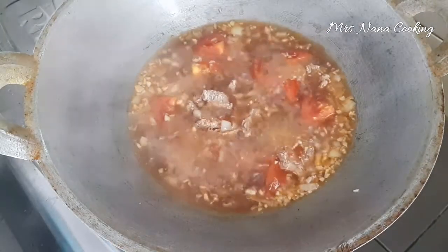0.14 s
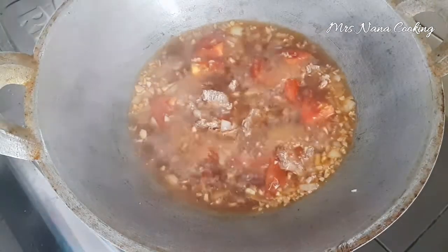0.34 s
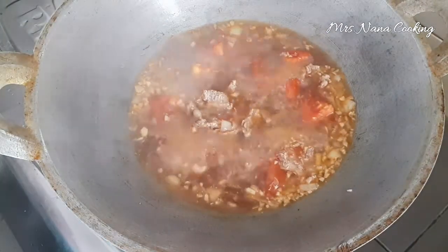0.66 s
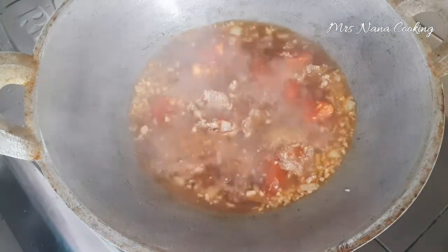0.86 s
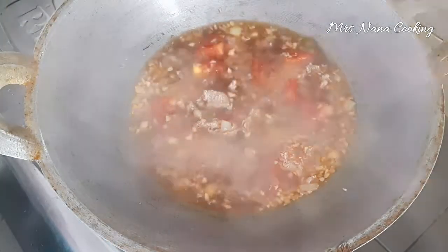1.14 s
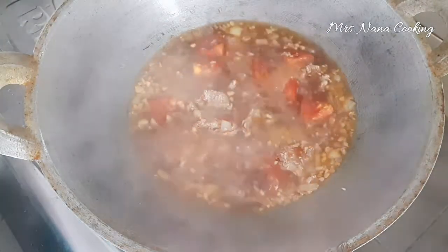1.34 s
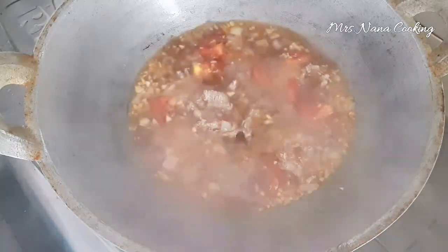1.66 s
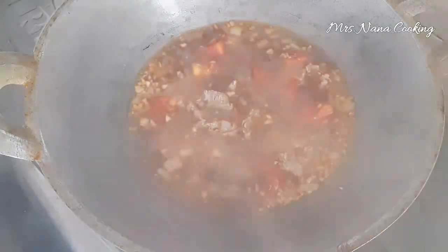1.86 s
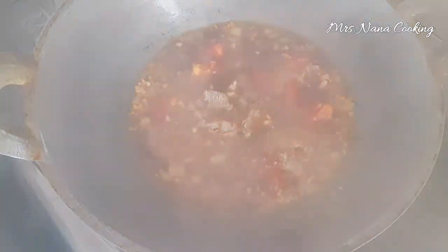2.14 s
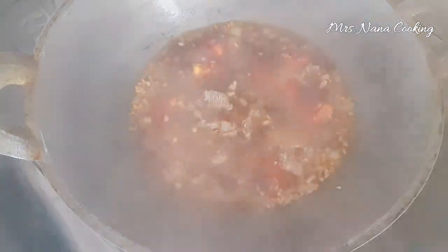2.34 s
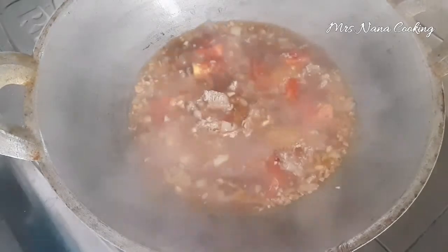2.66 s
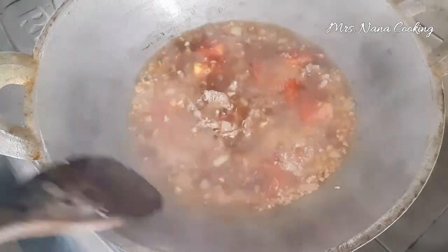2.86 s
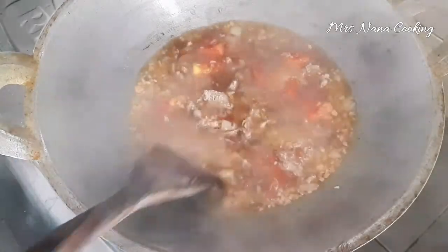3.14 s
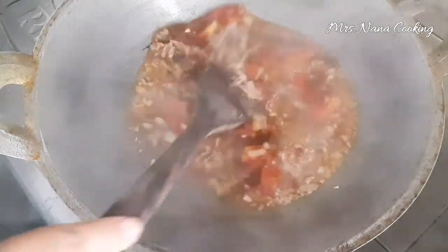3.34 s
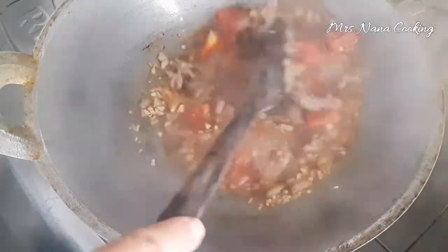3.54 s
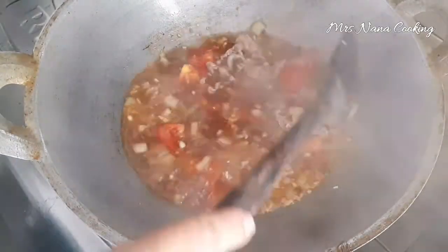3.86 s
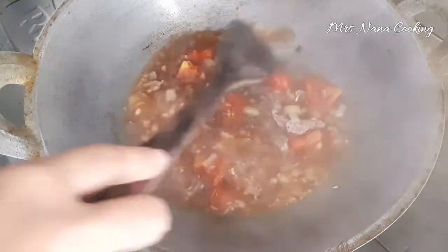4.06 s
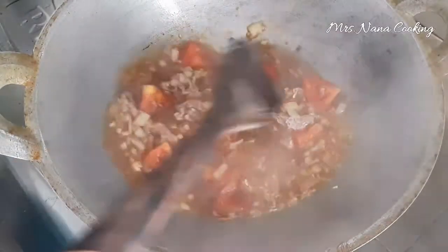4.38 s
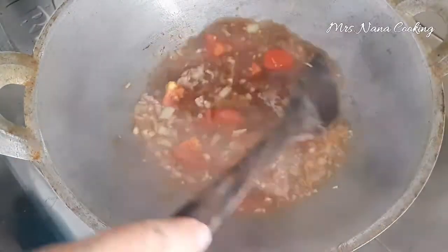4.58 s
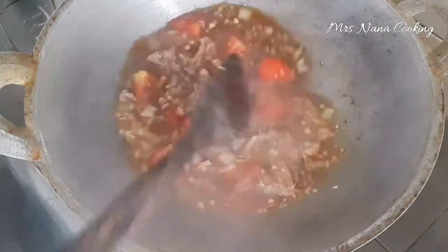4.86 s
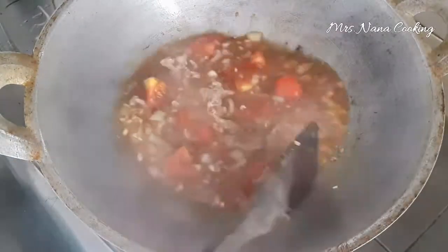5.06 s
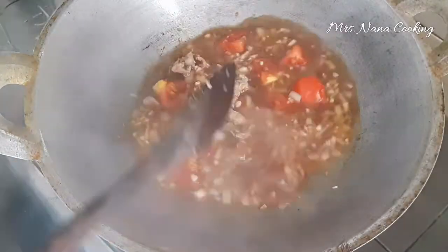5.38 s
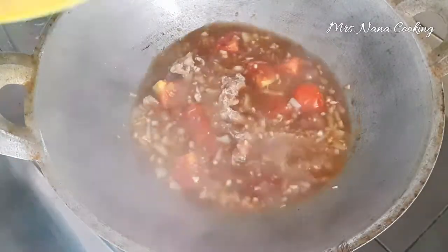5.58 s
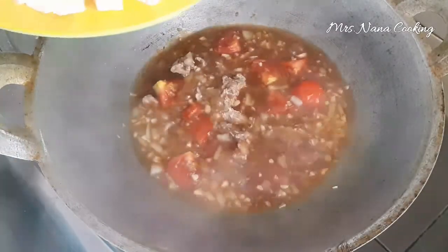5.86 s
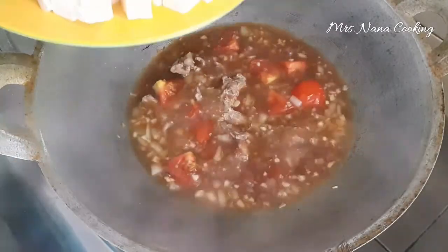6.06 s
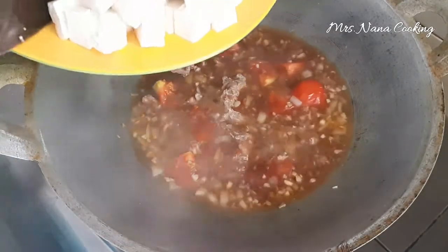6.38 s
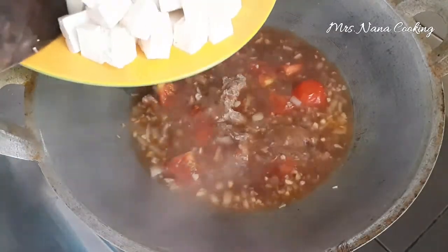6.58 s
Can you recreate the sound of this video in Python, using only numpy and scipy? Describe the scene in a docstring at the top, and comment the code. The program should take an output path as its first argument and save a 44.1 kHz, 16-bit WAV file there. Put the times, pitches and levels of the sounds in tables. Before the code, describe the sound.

Throughout, sauce boils in a wide metal wok: a dense fine fizz with tiny ticks and soft, round, slightly rising pops, over a low fluttering gas flame. A quick rattle of utensils opens the scene, lasting a tenth of a second; a sharper, lighter clatter comes at 1.1 and a faint brush at 1.4. Pops crowd from 1.6 to 2.5, with a dull counter thud at 2.2. At 3.3 a ladle clacks into the wok, slopping sauce and sizzling on hot metal, with steam hiss near 3.8. Pops cluster around 4.0 to 4.4, as heavy muffled knocks and scraping land at 4.1 to 4.3. The fizz drops, then slowly recovers; small high ticks near 4.8. A hard ringing ladle knock and short rattle follow at 5.3 to 5.5. From 5.6 a plate catches and slides, bumping at 6.15 and grinding around 6.3. Close phone pickup, lively hard-walled kitchen echo, highest treble missing.

```python
"""Sauce boils with a fine fizz and small popping bubbles over a rumbling gas flame in a small, hard-walled kitchen.
Utensils clatter beside the stove; a ladle stirs, knocks the wok and washes sauce onto hot metal; a plate is dragged.
Fizz is filtered random clicks, single pops are short rising tones, and the flame is filtered noise.
Rubbed and rattled things are clicks that ring an object; the ladle also adds decaying sines. Echo surrounds them.
A phone just above the wok hears it all and loses the highest treble."""
import sys
import numpy as np
from scipy import signal
from scipy.fft import rfft, irfft
from scipy.io import wavfile
from scipy.ndimage import uniform_filter1d

SR = 44100
rng = np.random.default_rng(int(sys.argv[2]) if len(sys.argv) > 2 else 0)


def store_pcm(level_fs):
    """Save levels as 16-bit WAV."""
    pcm = np.round(np.clip(level_fs, -1, 1) * 32767).astype(np.int16)
    wavfile.write(sys.argv[1], SR, np.atleast_2d(pcm).T)


N = 296219
T = np.arange(N) / SR  # time in seconds

# Broad colours of fizz, flame, sauce on hot metal and sauce flashing to steam.
# Each row: frequency in Hz, relative strength in dB per Hz.
FIZZ_COLOUR = [(240, -42), (400, -13), (498, -12.5), (610, -2), (686, -38), (716, -20), (1090, -6),
               (1510, -9), (2990, -8.5), (4490, -7.5), (13000, -15.5)]
FLAME_COLOUR = [(25, -24), (50, -20), (80, -15.5), (105, -2.5), (135, -7), (175, -7.5), (230, -10),
                (330, -5.5), (500, -16.5), (760, -10.5), (1200, -31), (3000, -57)]
SIZZLE_COLOUR = [(300, -38), (900, -4), (1450, 6.5), (2000, 6.5), (2600, 1), (4500, 6), (7000, -3.5),
                 (10500, -9), (13000, -17)]  # also the gritty scuffs of the plate
STEAM_COLOUR = [(500, -48), (1500, -0.5), (3000, 1.5), (5000, 0), (8000, -5.5), (11500, -5.5), (13000, -18)]
# Hollows under the wok that the flame excites. Each row: frequency in Hz, width in Hz, lift in dB.
FLAME_PEAKS = [(78, 3.4, 12.5), (139, 7.8, 5.5), (163.8, 12, 9), (745, 29, 2), (774, 16, 3.5),
               (848, 8.5, 7.5)]

# Single pops that stand out, with a few high ticks, perhaps drips or ladle taps, near 4.7 s.
# Each row: start in seconds, level before the room in dB, pitch in Hz.
SINGLE_POPS = [(0.676, -38, 1180), (0.781, -31.5, 2150), (0.885, -37, 1160), (1.563, -34.5, 940),
               (1.626, -36.5, 1060), (1.705, -35.5, 1090), (1.840, -28.5, 1040), (1.993, -36.5, 796),
               (2.058, -35, 1200), (2.080, -32.5, 1100), (2.086, -32, 1500), (2.198, -31.5, 930),
               (2.353, -30, 1150), (2.447, -36.5, 1330), (2.878, -33.5, 1100), (2.991, -36, 820),
               (3.854, -33, 1100), (3.936, -26.5, 1250), (3.951, -29.5, 1010), (3.989, -28.5, 1270),
               (4.007, -28.5, 1000), (4.053, -32, 1190), (4.092, -31, 1170), (4.109, -38, 960),
               (4.308, -29, 1400), (4.36, -31.5, 1290), (4.380, -31, 1160), (4.415, -33.5, 927),
               (4.623, -46, 1100), (4.657, -35.5, 2380), (4.755, -39, 990), (4.759, -33.5, 2550),
               (4.845, -31, 2780), (4.863, -38, 1200)]
# Spells when the sauce wells up and middling bubbles crowd.
# Each row: start in seconds, length in seconds, middle level before the room in dB.
WELLINGS = [(0.449, .5, -43), (1.582, 0.95, -42)]

# Ladle meets wok. Each row: start in seconds, push on the bowl in dB,
# ladle ring in dB (added to the level of each of its tones), contact cut-off in Hz.
KNOCKS = [(3.28, -13, -38.5, 700), (4.129, 2.5, -60, 600), (4.143, -2.5, -64, 550), (4.169, -3, -63, 260),
          (4.235, 4.5, -64, 200), (4.284, -6.5, -64, 260), (4.845, -23.5, -61, 1180), (4.95, -4, -66, 200),
          (5.309, 5.5, -37, 1720), (5.322, -12, -61, 700), (5.337, 2, -61, 400), (5.369, -11, -62, 980),
          (5.382, -6.5, -60, 800), (5.424, -10.5, -52.5, 1400), (5.487, -10.5, -54.5, 1480)]
# Tones of the struck ladle. Each row: pitch in Hz, relative level in dB, time to fade by 60 dB in seconds.
LADLE_TONES = [(1910, 7.5, 0.039), (2180, 4, 0.02), (2700, 5, 0.022), (3080, 7, 0.018), (3300, 5, 0.025),
               (3710, 8, 0.024), (4270, 8, 0.031), (4600, 9, 0.02), (5044, 6, 0.036), (5360, -6, 0.02),
               (6010, -1, 0.025), (6700, 6.5, 0.012), (9000, 9, 0.0018)]

# Strokes of rubbing, rattling or sliding.
# Each row: time of the peak in seconds, relative force in dB, rise time in seconds, fall time in seconds.
UTENSIL_RATTLE = [(0.008, -28, 0.0094, 0.0046), (0.021, -21, 0.0012, 0.0073), (0.032, -22, 0.007, 0.006),
                  (0.043, -15, 0.002, 0.0064), (0.054, -15, 0.0025, 0.008), (0.069, -17.5, 0.002, 0.007),
                  (0.085, -18.5, 0.002, 0.005), (0.099, -27, 0.0022, 0.0057)]
UTENSIL_LIFT = [(1.081, -20.5, 0.0039, 0.0046), (1.088, -23, 0.001, 0.0082), (1.097, -29, 0.0022, 0.014),
                (1.112, -30.5, 0.0025, 0.0097), (1.131, -32.5, 0.0035, 0.006)]
UTENSIL_BRUSH = [(1.415, -33.5, 0.012, 0.02), (1.483, -42, 0.0019, 0.0064), (2.69, -44, 0.013, 0.0041),
                 (3.066, -48, 0.0034, 0.0079)]
COUNTER_THUDS = [(2.215, -28.5, 0.0076, 0.0094), (2.241, -36.5, 0.0025, 0.044),
                 (5.519, -26.5, 0.0015, 0.007), (5.551, -39, 0.0033, 0.043), (5.612, -38.5, 0.012, 0.053),
                 (5.74, -36, 0.036, 0.024)]
LADLE_SCRAPES = [(3.31, -44.5, 0.023, 0.076), (3.43, -45, 0.037, 0.028), (3.55, -47, 0.052, 0.081),
                 (4.15, -29.5, 0.0072, 0.026), (4.21, -38, 0.11, 0.064), (5.322, -25.5, 0.0054, 0.015),
                 (5.37, -40, 0.015, 0.06)]
SLOPS = [(3.285, -38.5, 0.0038, 0.021), (3.355, -44.5, 0.01, 0.047), (3.53, -51, 0.043, 0.034),
         (3.6, -46.5, 0.024, 0.045), (4.3, -41, 0.022, 0.03), (4.937, -38.5, 0.018, 0.026),
         (4.995, -49, 0.015, 0.024)]  # the ladle shoves a wave of sauce, a hollow slop
WASHES = [(3.43, -37, 0.043, 0.045), (3.545, -38.5, 0.046, 0.021), (4.21, -42.5, 0.035, 0.12),
          (4.917, -49, 0.04, 0.057), (5.07, -54, 0.03, 0.037)]  # sauce is pushed up the hot wall
FLASH_BOILS = [(3.77, -48.5, 0.13, 0.066), (3.84, -42, 0.088, 0.012), (4.917, -48.5, 0.014, 0.044)]  # sauce flashes to steam
PLATE_SLIDES = [(5.683, -25, 0.00084, 0.021), (5.742, -25, 0.029, 0.059), (6.235, -33, 0.036, 0.052),
                (6.285, -20.5, 0.016, 0.035), (6.325, -18.5, 0.0033, 0.014), (6.35, -18.5, 0.0089, 0.03),
                (6.385, -24, 0.01, 0.038), (6.49, -36, 0.027, 0.058), (6.66, -56, 0.037, 0.0055)]
PLATE_CATCHES = [(5.600, -29.5, 0.0056, 0.012), (5.613, -33.5, 0.012, 0.088), (6.145, -27, 0.0013, 0.1),
                 (6.56, -34, 0.067, 0.12)]  # the rim drags with a low groan
PLATE_SCUFFS = [(5.683, -36.5, 0.0013, 0.042), (6.145, -31, 0.0014, 0.0039), (6.33, -35, 0.084, 0.14),
                (6.655, -38.5, 0.014, 0.0073)]  # the plate's foot grates
PLATE_BUMPS = [(6.146, -19, 0.0029, 0.013), (6.172, -17, 0.011, 0.042), (6.37, -24, 0.014, 0.043),
               (6.42, -25.5, 0.016, 0.033), (6.49, -27.5, 0.017, 0.038), (6.65, -36, 0.011, 0.037)]

# Broad colours of what is struck or rubbed. Each row: frequency in Hz, relative strength in dB per Hz.
RATTLE_COLOUR = [(47, -42), (80, -30), (162, -12), (330, -25), (510, -10), (780, -5.5), (1100, -8.5),
                 (1400, -14), (2000, -22), (3200, -23), (4800, -30.5), (7000, -26), (13000, -41.5)]
LIFT_COLOUR = [(47, -48), (80, -32), (140, -7), (200, -14), (440, -16.5), (520, -4.5), (650, -9),
               (800, 1.5), (1000, -4.5), (1400, -8), (2300, -9), (2900, -23.5), (3400, -22), (4600, -29.5),
               (6500, -24), (13000, -37)]
BRUSH_COLOUR = [(150, -5), (400, 0), (900, 9), (1600, 9.5), (2500, 10.5), (4000, 4), (7000, -7),
                (13000, -15)]
COUNTER_COLOUR = [(40, -38), (80, -5), (140, -7.5), (200, -3.5), (280, -6.5), (400, -13.5), (800, -18),
                  (3000, -36)]
BOWL_COLOUR = [(50, -23), (100, -16), (160, -11), (250, -7), (340, 0.5), (440, -5), (510, -7), (580, -1.5),
               (700, -6.5), (860, -4), (1120, -2), (1320, -2.5), (1550, -13), (2200, -14), (3000, -30),
               (4600, -20), (7000, -45), (13000, -43)]
SCRAPE_COLOUR = [(80, -21.5), (170, 0.5), (310, -5), (430, 0.5), (550, -1.5), (780, -6.5), (1100, -5),
                 (2000, -22), (4500, -15.5), (12000, -50)]
SLOP_COLOUR = [(100, -32.5), (220, -11.5), (340, -2), (450, -3.5), (520, -13), (850, -18.5), (1300, -22),
               (4000, -45)]
PLATE_COLOUR = [(59, -39), (100, -15), (277, -11.5), (410, -17.5), (530, -4.5), (766, -4.5), (1040, -4),
                (1150, -6.5), (1730, -7), (2940, -16), (3190, -19.5), (3990, -23), (4330, -25),
                (13000, -46.5)]
CATCH_COLOUR = [(60, -28), (110, -0.5), (260, -14), (360, -12.5), (490, -5), (640, -2), (860, -9),
                (1000, 0.5), (1150, -8.5), (1300, -5.5), (2000, -13), (4000, -22), (13000, -62)]
BUMP_COLOUR = [(40, -29), (90, -7.5), (140, -1.5), (210, -2), (270, 6), (360, -25), (550, -24), (900, -47),
               (3000, -61)]

# Resonances that stand out of those colours. Each row: frequency in Hz, width in Hz, lift in dB.
RATTLE_PEAKS = [(525, 60, 5.7), (588, 43, 5.9), (790, 110, 6.2), (805, 0.5, 12.6), (870, 72, 3.8),
                (1060, 29, 4.5), (1610, 81, 6), (1760, 160, 7.4), (2080, 32, 9), (2350, 84, 17.3),
                (2643, 92, 22.2), (2830, 41, 19.5), (2940, 110, 14), (3350, 87, 17), (3580, 100, 17.6),
                (3920, 73, 15), (4400, 88, 19), (4510, 60, 18), (5030, 40, 13), (5480, 180, 14),
                (6640, 140, 6.8), (7010, 60, 8)]
LIFT_PEAKS = [(752, 50, 9.4), (875, 76, 4.3), (1120, 89, 8.4), (1530, 33, 7.5), (2025, 38, 13.6),
              (2596, 24, 10), (2720, 34, 13), (3106, 46, 21.7), (3740, 45, 13), (4100, 85, 20),
              (4360, 55, 17), (4680, 55, 12), (5200, 37, 12), (5440, 47, 14), (5870, 40, 14),
              (6130, 61, 14)]
BRUSH_PEAKS = [(990, 52, 5), (1520, 35, 2.7), (2150, 44, 2.6), (2460, 130, 7.3), (3250, 46, 2.4),
               (4370, 120, 8.7)]
COUNTER_PEAKS = [(85.4, 2.1, 7), (151, 17, 15), (186, 3.3, 7.3), (240, 20, 13.4), (281, 31, 9.6)]
BOWL_PEAKS = [(199, 5.4, 7.5), (263, 6.3, 10), (322, 11.4, 13.4), (372, 15, 8.2), (404, 14, 7.8),
              (434, 12, 7), (464, 7.9, 5), (622, 11, 12.2), (749, 22, 15.6), (800, 13, 4.7), (841, 7.7, 14),
              (897, 17, 9.7), (1001, 5, 4.9), (1066, 8, 5), (1214, 9.7, 5.5), (1475, 8, 9.4)]
PLATE_PEAKS = [(533, 95, 3.3), (1028, 42, 11.6), (1230, 44, 9.9), (1420, 120, 5), (1700, 140, 4.1),
               (2040, 24, 3.3), (2400, 23, 5.1), (2550, 38, 5.3), (2970, 120, 3.8), (3580, 69, 8.1),
               (4050, 140, 3.4), (4700, 67, 5)]
CATCH_PEAKS = [(488, 34, 8.3), (680, 35, 4.4), (1017, 50, 8), (1300, 70, 4), (1430, 60, 8.1)]
BUMP_PEAKS = [(252, 22, 9.5), (293, 19, 8)]

# Echo of the kitchen. Each row: frequency in Hz, time to fade by 60 dB in seconds,
# likeness of left and right (correlation, no unit).
KITCHEN = [(108, 1, 0.94), (304, 0.68, 0.75), (580, 0.58, 0.81), (1100, 0.57, -0.065), (2290, 0.52, 0.09),
           (4500, 0.51, 0.17), (12000, 0.43, -0.16)]

# The boil is steady until stirring folds cooler sauce over the hot rim; then the flame slowly brings it back.
BOIL_DB, STIRRED_S, COOLING_S, COOLING_DB, REHEAT_DB_PER_S = -49.5, 4.39, 0.19, 5.5, 1
WELLING_POPS_PER_S, POP_PITCH_HZ, POP_OCTAVES = 18, 1100, 0.49  # octaves: full range of pitch in a spell
ABRUPT_S = 0.0037  # strokes that rise faster than this land with a blow
# Each blow lands elsewhere, under a different depth of sauce: spread of the tones' pitch (share) and level.
MODE_DETUNE, MODE_SCATTER_DB = 0.0061, 7.5
TOP_HZ = 13100  # the phone loses what lies above


def amp(db):
    """Turn decibels into a plain factor."""
    return 10 ** (np.asarray(db) / 20)


def unit(x):
    """Scale a sound to an average strength (rms) of 1."""
    return x / np.sqrt(np.mean(x ** 2))


def on_log_axis(hz, points, axis=1):
    """Read one column of a table along log frequency."""
    rows = np.array(points)
    return np.interp(np.log(hz + 1), np.log(rows[:, 0]), rows[:, axis])


def convolve(x, response):
    """Let each sample of a sound set off the response."""
    return signal.fftconvolve(np.atleast_2d(x), np.atleast_2d(response), axes=-1)[:, :N]


def causal(gain):
    """Build the promptest response with this gain over frequency (minimum phase)."""
    cepstrum = irfft(np.log(gain))
    half = len(cepstrum) // 2
    cepstrum[1:half] *= 2
    cepstrum[half + 1:] = 0
    return irfft(np.exp(rfft(cepstrum)))


def body(colour, peaks=(), size=32768):
    """Response of an object, with unit energy: a broad colour with resonances standing out of it."""
    hz = np.arange(size // 2 + 1) * SR / size
    lift = 1 + sum((amp(db) ** 2 - 1) / (1 + (2 * (hz - f) / width) ** 2) for f, width, db in peaks)
    response = causal(amp(on_log_axis(hz, colour)) * np.sqrt(np.maximum(lift, .5)))
    return response / np.linalg.norm(response)


def clicks(rate, spread_db):
    """Random tiny impacts, rate per second, with unequal sizes; rms 1."""
    size = amp(spread_db * np.minimum(rng.exponential(size=N), 5))
    happens = rng.random(N) < rate / SR
    return unit(happens * size * rng.choice([-1, 1], N))


def walk(rate):
    """Smooth random drift with a spread near 1, with rate turning points per second."""
    return np.interp(T * rate, np.arange(1000), rng.standard_normal(1000))


def add(track, s, sound):
    """Lay a short sound into a track at s seconds."""
    start = max(int(s * SR), 0)
    track[start:start + len(sound)] += sound[:max(N - start, 0)]


def evened(echo, hz, size=21):
    """Level the low room resonances so that none of them booms."""
    power = uniform_filter1d(np.mean(np.abs(rfft(echo)) ** 2, axis=0), size)
    return convolve(echo, causal(power ** (-.5 / (1 + (hz / 2000) ** 2))))


def kitchen(size=32768):
    """Stereo echo of tiled walls: fading noise whose lows stay longer and are more alike in both channels."""
    t, hz = T[:size], np.arange(size // 2 + 1) * SR / size
    alike = np.clip(on_log_axis(hz, KITCHEN, axis=2), -1, 1)
    mid, side = rfft(rng.standard_normal((2, size)))
    opposite = np.array([[1], [-1]])
    noise = mid * np.sqrt((1 + alike) / 2) + opposite * side * np.sqrt((1 - alike) / 2)
    echo = 0
    for k, (_, t60, _) in enumerate(KITCHEN):
        band = on_log_axis(hz, [(row[0], j == k) for j, row in enumerate(KITCHEN)])
        decay = np.exp(-np.log(1000) * t / t60)
        onset = np.clip(t / 0.0023, 0, 1)
        early_boost = 1 + 2.5 * np.exp(-t / 0.014)
        fade = decay * onset * early_boost
        echo = echo + irfft(noise * band) * fade / np.linalg.norm(fade)
    return evened(echo, hz)


def place(x, wet_db, count=0):
    """Direct sound, reaching the left port count samples late, plus room echo; power is roughly kept."""
    x = np.ravel(x)
    direct = np.array([np.pad(x, (count, 0))[:N], x])
    return (direct + amp(wet_db) * convolve(x, kitchen())) / np.hypot(1, amp(wet_db))


def bubble(hz, cycles, glide=0.01):
    """A bursting cap leaves a little cavity that rings briefly, rising in pitch as it opens."""
    turn = T[:SR // 60] * hz
    swell = turn / cycles * np.exp(.5 - .5 * (turn / cycles) ** 2)
    return swell * np.sin(2 * np.pi * turn * (1 + glide * turn))


def rub(strokes, colour, peaks, rate, spread_db, blow_db=-40):
    """Uneven stick-slip clicks follow each stroke and ring the object; an abrupt stroke lands with a blow."""
    force = sum(amp(db) * np.exp(-np.maximum((s - T) / rise, (T - s) / fall)) for s, db, rise, fall in strokes)
    grip = amp(3 * walk(140) - .7)
    drive = unit(force * grip * clicks(rate, spread_db)) * np.sqrt(np.mean(force ** 2))
    for s, db, rise, _ in strokes:
        blow = amp([db + blow_db]) * np.exp(-(rise / ABRUPT_S) ** 2)  # a single sample
        add(drive, s, blow)
    return convolve(drive, body(colour, peaks))


def heat_db():
    """Vigour of the boil, 0 dB when full: it sinks as the sauce is stirred and creeps back."""
    cooled = COOLING_DB * np.clip((T - STIRRED_S) / COOLING_S, 0, 1)
    reheated = REHEAT_DB_PER_S * np.maximum(T - STIRRED_S - COOLING_S, 0)
    return np.minimum(reheated - cooled, 0)


def fizz(crackle_db=-53, spread_db=3, pitch_hz=3400, surge_db=-0.5, flicker_db=2.0, count=900):
    """Countless tiny bubbles all round the rim hiss; single ones tick above them, each at its own pitch."""
    vigour = amp(heat_db() + surge_db * walk(34) + flicker_db * walk(45))
    hiss = np.array([clicks(14000, 1.0), clicks(14000, 3.9)]) * amp(BOIL_DB)  # left, right
    crackle = np.zeros(N)
    for when, size, pitch in rng.random((count, 3)):
        tick_db = crackle_db - spread_db * np.log(max(size, .02))
        hz = pitch_hz * 2 ** (2.6 * (pitch - .5))
        add(crackle, when * T[-1], amp(tick_db) * bubble(hz, cycles=4.7, glide=0.0036))
    return convolve(hiss * vigour, body(FIZZ_COLOUR)) + place(crackle * vigour, wet_db=8)


def burner(flame_db=-56):
    """The gas flame, noise coloured by hollows under the bowl, rumbles and flutters."""
    flutter = amp(1.5 * walk(9))
    roar = convolve(rng.standard_normal(N) * flutter, body(FLAME_COLOUR, FLAME_PEAKS))
    return amp(flame_db) * place(roar, wet_db=-3)


def popping(small_db=-51.5, spread_db=5.0, wet_db=-2, cycles=0.83, count=420):
    """Single pops stand out, middling bubbles come in spells, and many small ones weaken as the sauce cools."""
    out, heat = np.zeros(N), heat_db()
    for s, db, hz in SINGLE_POPS:
        add(out, s, amp(db) * bubble(hz, cycles))
    for (start, length, db), draws in zip(WELLINGS, rng.random((len(WELLINGS), 40, 3))):
        for k, (when, size, pitch) in enumerate(draws):
            delay = (k + when) / WELLING_POPS_PER_S
            if delay < length:
                hz = POP_PITCH_HZ * 2 ** (POP_OCTAVES * (pitch - .5))
                add(out, start + delay, amp(db) * (.5 + size) * bubble(hz, cycles))
    for when, size, pitch in rng.random((count, 3)):
        db = small_db - spread_db * np.log(max(size, .03)) + heat[int(when * N)]
        hz = POP_PITCH_HZ * 2 ** (1.4 * (pitch - .5))
        add(out, when * T[-1], amp(db) * bubble(hz, cycles=0.98))
    return place(out, wet_db)


def utensils():
    """Things handled beside the stove rattle, brush and thud, heard mostly by way of the walls."""
    rattle = rub(UTENSIL_RATTLE, RATTLE_COLOUR, RATTLE_PEAKS, rate=2200, spread_db=1.0, blow_db=17)
    lift = rub(UTENSIL_LIFT, LIFT_COLOUR, LIFT_PEAKS, rate=2400, spread_db=1.5, blow_db=24.0)
    brush = rub(UTENSIL_BRUSH, BRUSH_COLOUR, BRUSH_PEAKS, rate=2000, spread_db=2, blow_db=16)
    thuds = rub(COUNTER_THUDS, COUNTER_COLOUR, COUNTER_PEAKS, rate=3100, spread_db=2.5)
    handled = place(lift + brush, wet_db=5.5, count=17)[::-1]  # channels swapped: the right port hears it late
    return place(rattle, wet_db=2.0, count=4) + handled + place(thuds, wet_db=1.5)


def ring(modes):
    """Decaying sines of a struck object, a little different at each blow; neighbours start in opposite directions."""
    t = T[:SR // 2]
    chance = rng.standard_normal((len(modes), 2))
    total = np.zeros(len(t))
    for k, ((hz, db, t60), (louder, higher)) in enumerate(zip(modes, chance)):
        fade = amp(db + MODE_SCATTER_DB * louder - 60 * t / t60)
        tone = np.sin(2 * np.pi * hz * (1 + MODE_DETUNE * higher) * t)
        total += (-1) ** k * fade * tone
    return total / 2


def stirring():
    """The ladle knocks and scrapes the bowl and slops the sauce; sauce pushed up the hot wall sizzles."""
    bowl, ladle = np.zeros(N), np.zeros(N)
    t = T[:SR // 100]
    for s, bowl_db, ladle_db, contact_hz in KNOCKS:
        push = t * np.exp(-4 * np.pi * contact_hz * t)  # food in between makes a longer, softer push
        add(bowl, s, amp(bowl_db) * push / push.sum())
        add(ladle, s, amp(ladle_db) * ring(LADLE_TONES))
    bowl_knocks = place(convolve(bowl, body(BOWL_COLOUR, BOWL_PEAKS)), wet_db=1.5)
    knocks = bowl_knocks + place(ladle, wet_db=0)
    scrape = place(rub(LADLE_SCRAPES, SCRAPE_COLOUR, BOWL_PEAKS, rate=2500, spread_db=2.0), wet_db=2.5)
    slop = place(rub(SLOPS, SLOP_COLOUR, [], rate=1500, spread_db=1), wet_db=-3)
    sizzle = place(rub(WASHES, SIZZLE_COLOUR, [], rate=9000, spread_db=2), wet_db=2)
    steam = place(rub(FLASH_BOILS, STEAM_COLOUR, [], rate=8200, spread_db=3), wet_db=4)
    return knocks + scrape + slop + sizzle + steam


def plate(bump_db=-5.5):
    """A plate to the right catches, bumps and grinds across the counter by stick-slip rubbing."""
    slide = rub(PLATE_SLIDES, PLATE_COLOUR, PLATE_PEAKS, rate=550, spread_db=2.0, blow_db=21.0)
    bumps = rub(PLATE_BUMPS, BUMP_COLOUR, BUMP_PEAKS, rate=1700, spread_db=-0.5)
    scuffs = rub(PLATE_SCUFFS, SIZZLE_COLOUR, [], rate=3300, spread_db=0)
    catches = rub(PLATE_CATCHES, CATCH_COLOUR, CATCH_PEAKS, rate=1200, spread_db=2.0, blow_db=20)
    grinding = place(slide + catches + scuffs, wet_db=7.5, count=15)
    bumping = amp(bump_db) * place(bumps, wet_db=-6.5, count=15)
    return (grinding + bumping) * amp([[-.3], [.3]])  # dB left, right


def scene():
    """Mix the boil, flame, utensils, ladle and plate."""
    return fizz() + burner() + popping() + utensils() + stirring() + plate()


def record(dry):
    """The phone cuts the top with a steep low-pass filter."""
    low_pass = signal.ellip(10, .2, 70, TOP_HZ, fs=SR, output="sos")
    return signal.sosfilt(low_pass, dry)


dry = scene()
out = record(dry)
store_pcm(out)
```